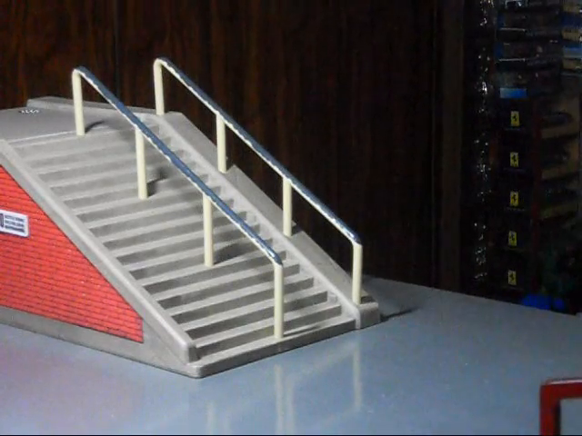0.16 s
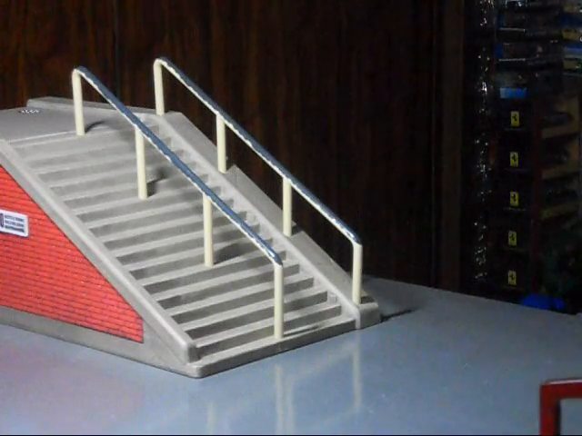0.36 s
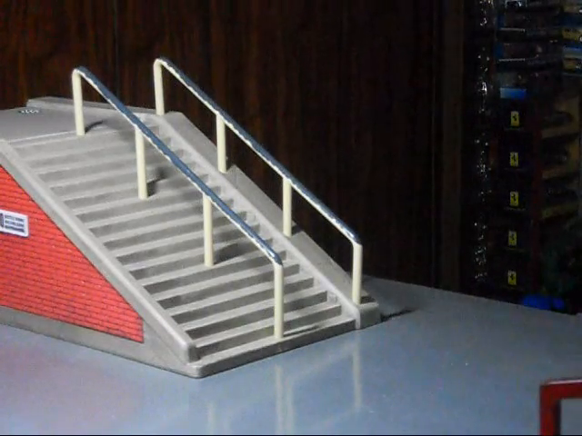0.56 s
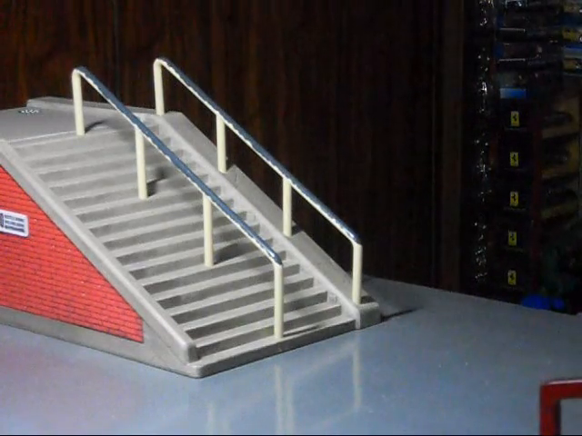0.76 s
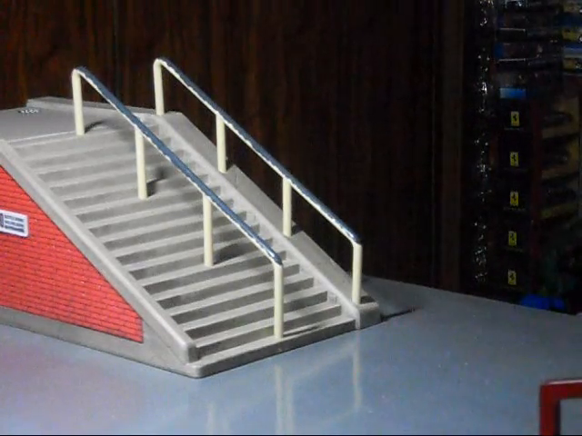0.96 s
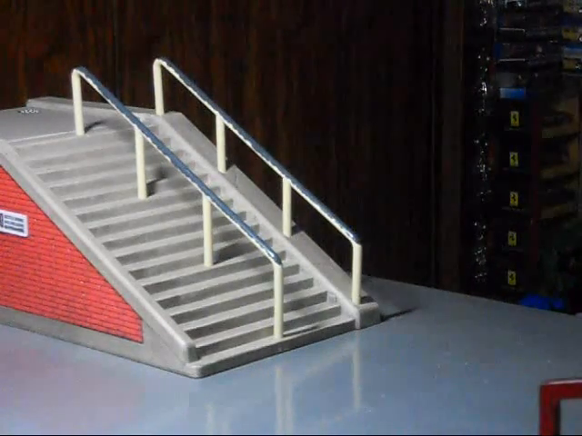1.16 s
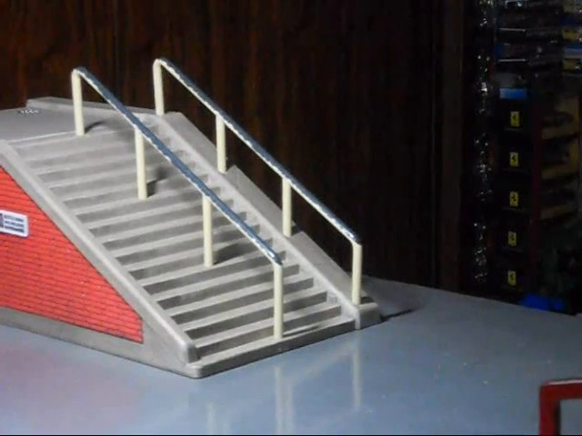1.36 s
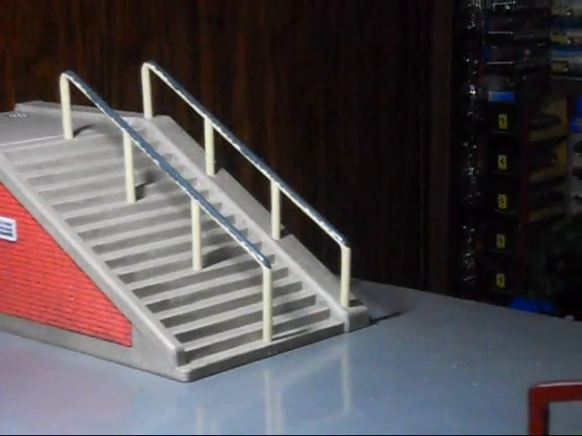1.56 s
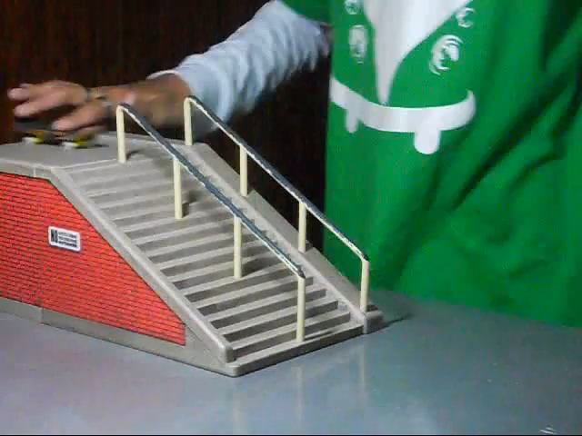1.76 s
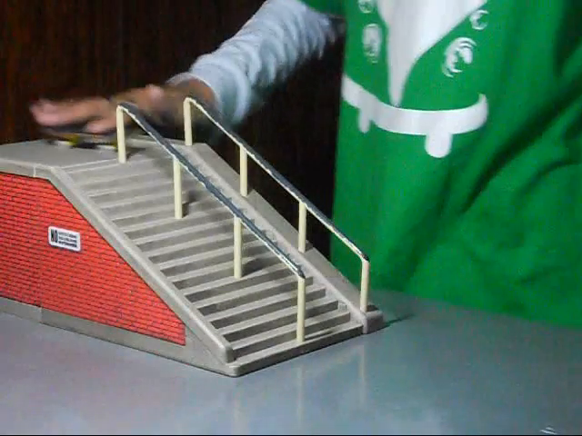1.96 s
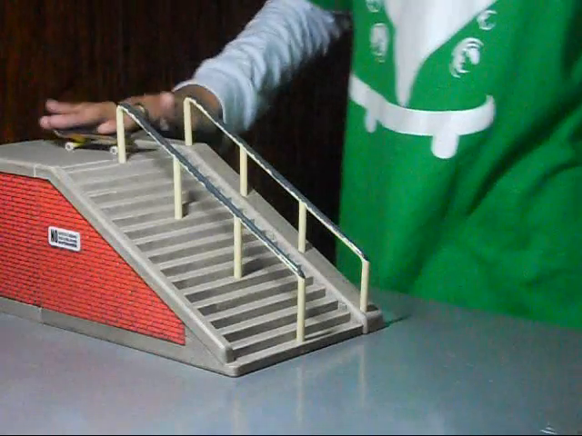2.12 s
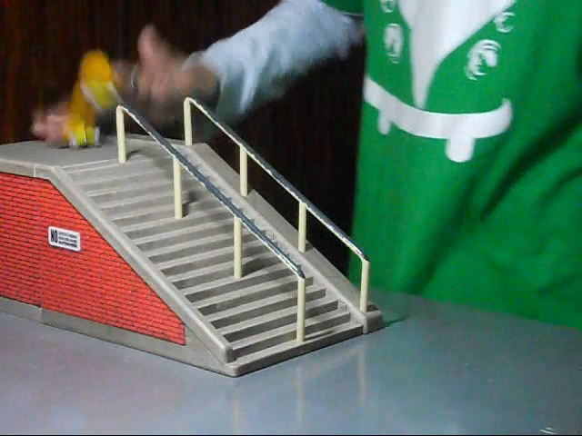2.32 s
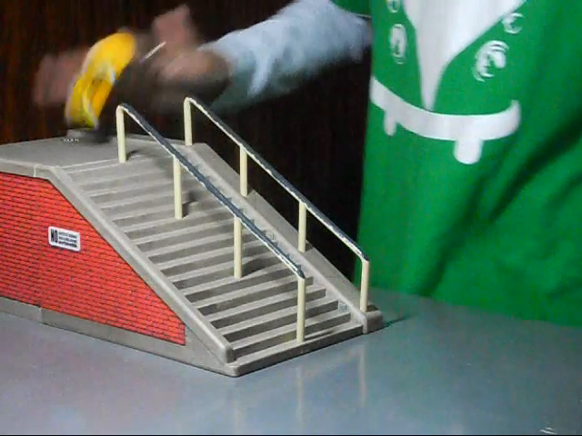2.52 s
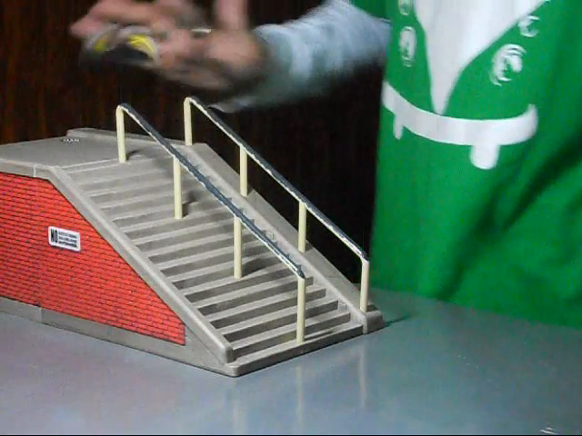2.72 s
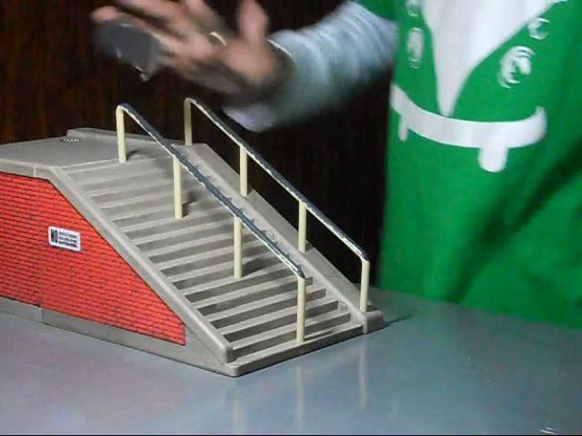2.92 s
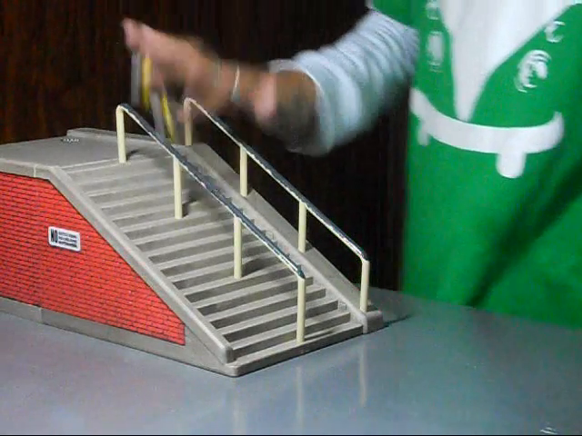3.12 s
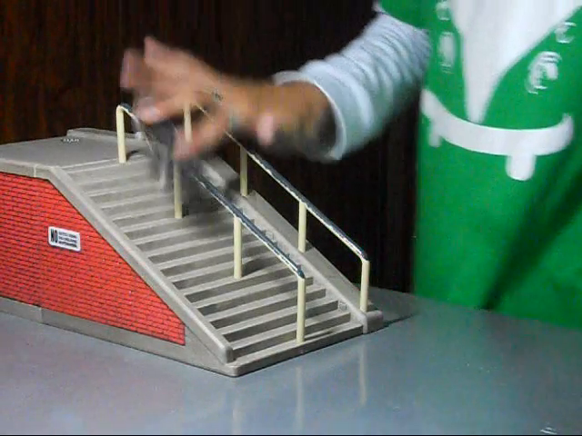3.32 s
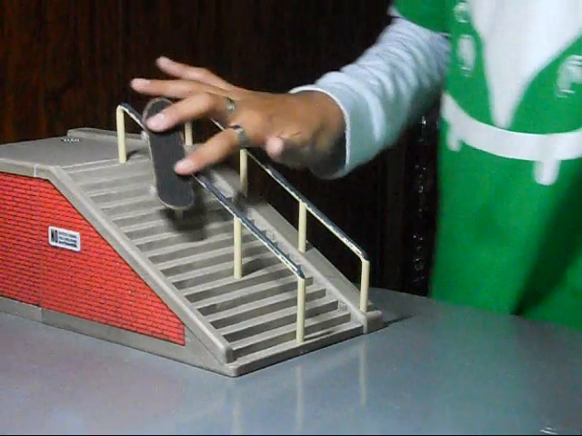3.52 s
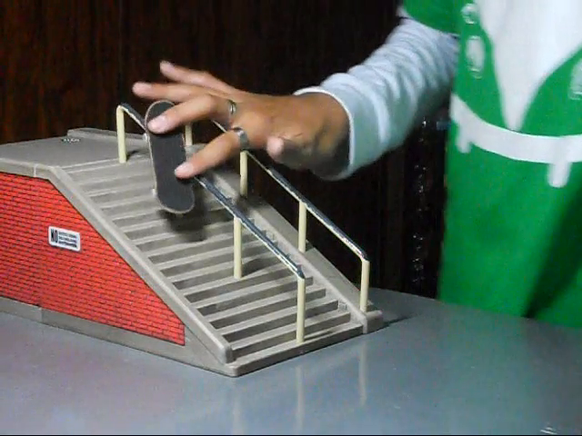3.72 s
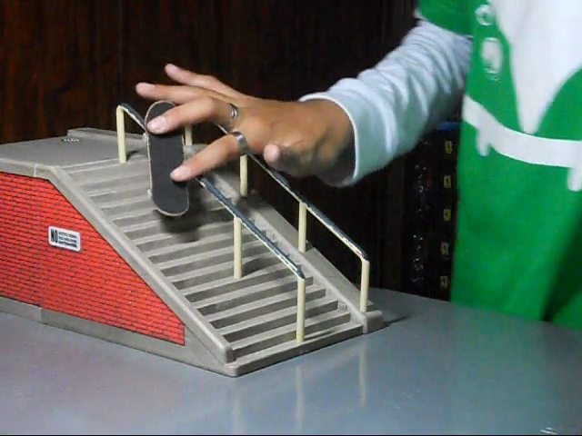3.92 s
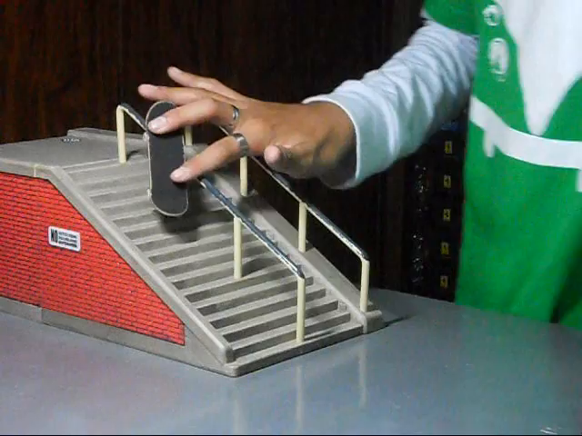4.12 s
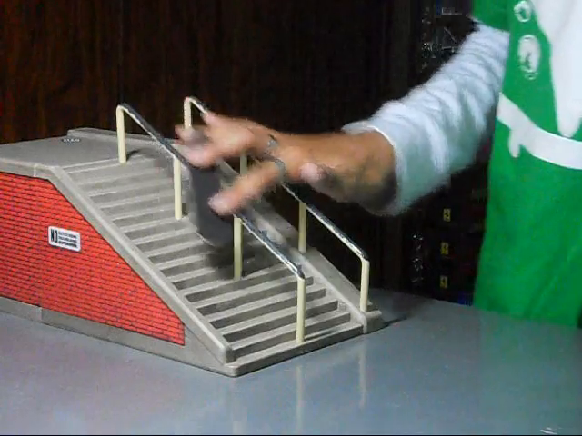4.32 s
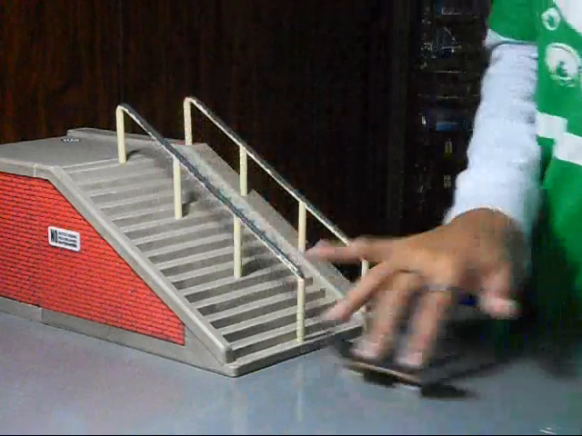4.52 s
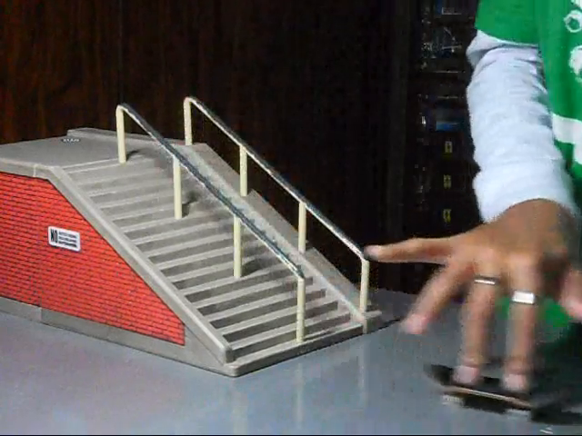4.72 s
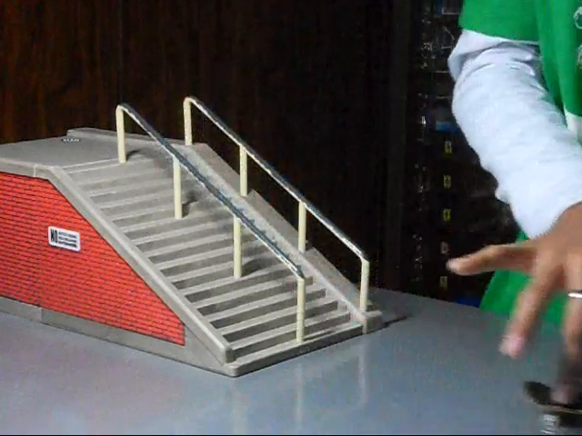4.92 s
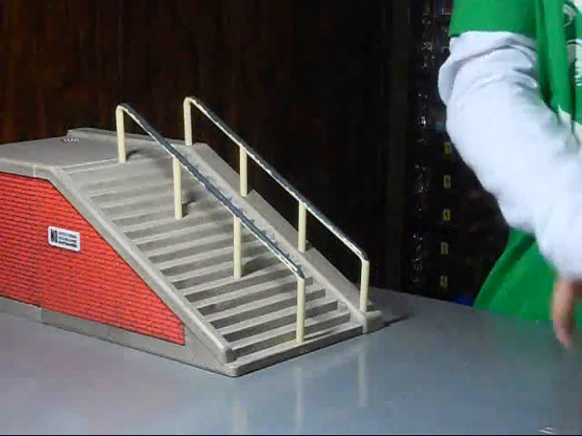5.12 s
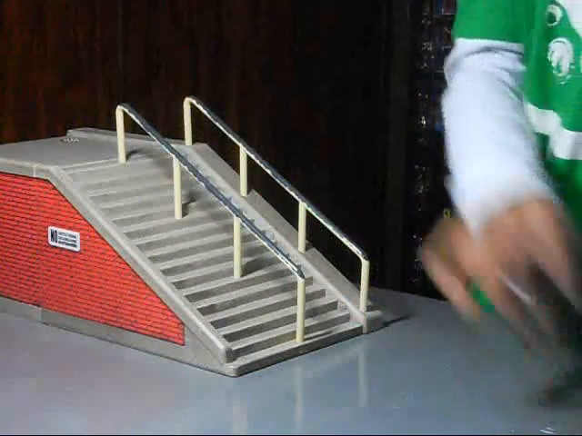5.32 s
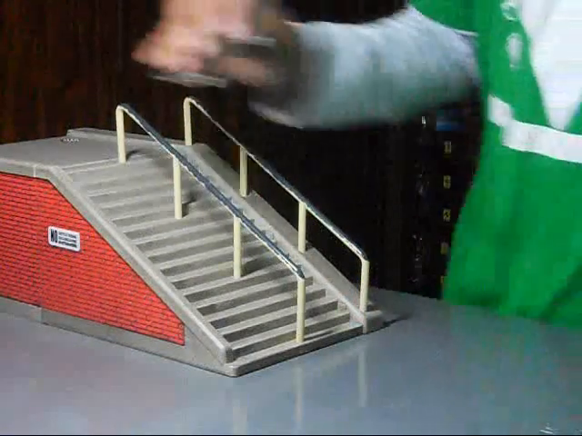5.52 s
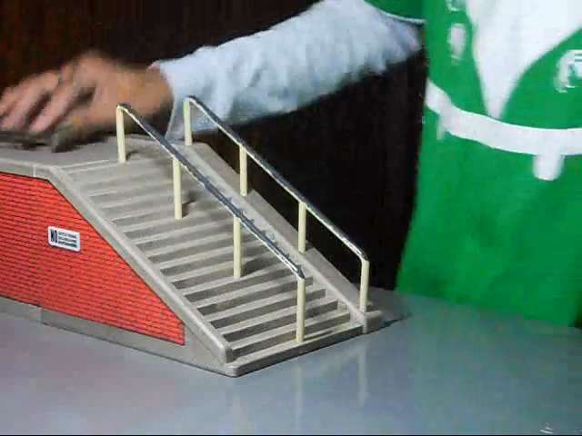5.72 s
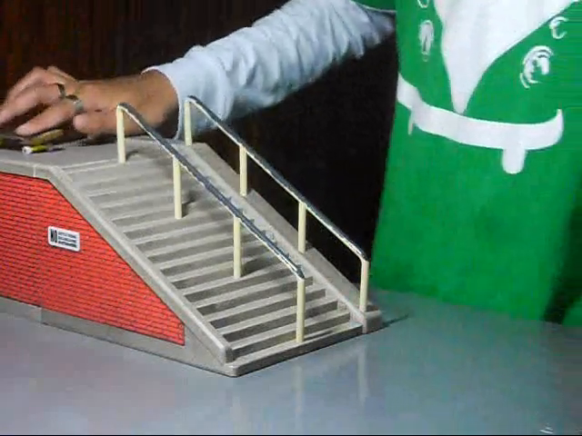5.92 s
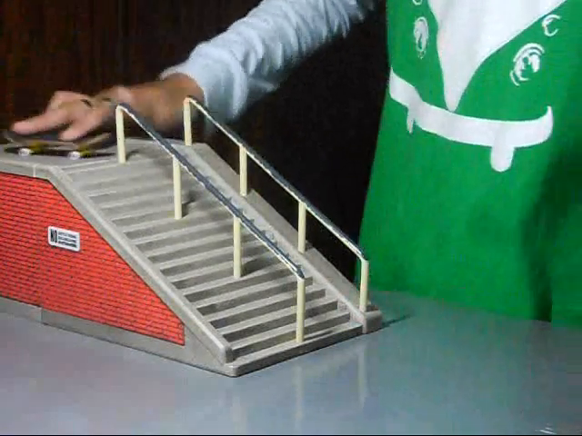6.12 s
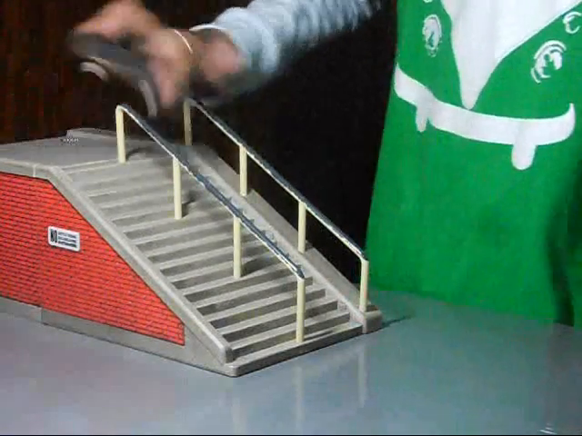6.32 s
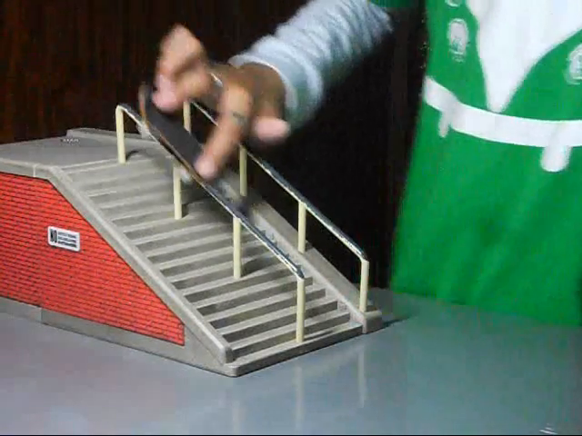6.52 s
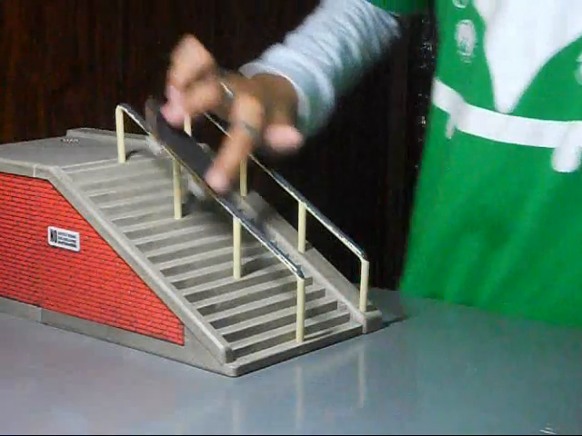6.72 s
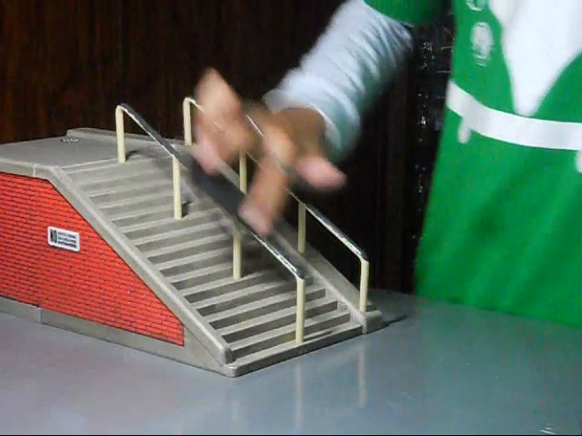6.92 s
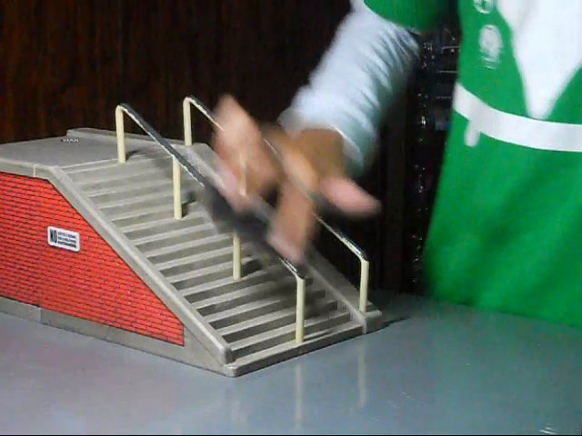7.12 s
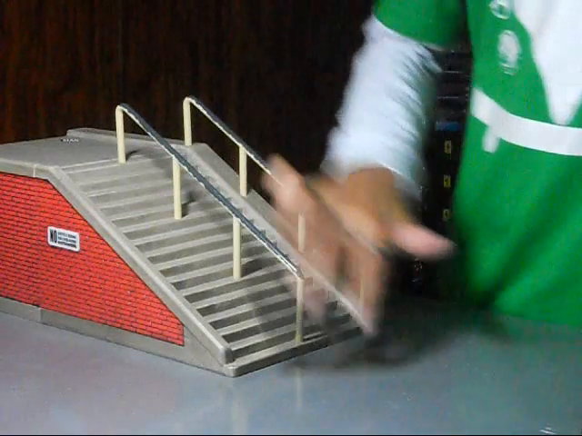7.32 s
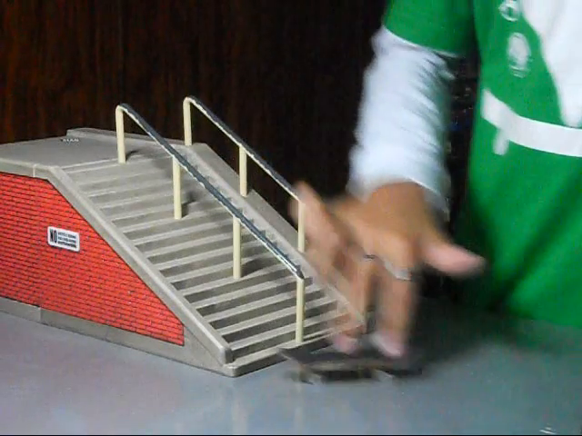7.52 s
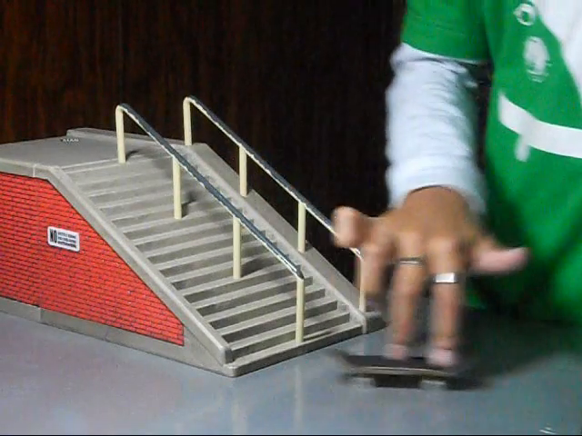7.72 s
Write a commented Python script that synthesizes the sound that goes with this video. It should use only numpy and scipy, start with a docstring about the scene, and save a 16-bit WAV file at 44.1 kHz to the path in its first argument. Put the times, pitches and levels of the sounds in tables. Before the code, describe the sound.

Small plastic wheels drone and scrape briefly, then ticks and soft handling bumps lead into a slowed passage of low groaning roll, hollow platform knock and heavy rail clatter. At true speed the board smacks the tabletop, rolls away, is clacked back onto the platform and popped. Its slide and clustered table knocks are again slowed and deepened. Dry little room, close basic camera microphone, low hum.

```python
"""In a small room, a toy skateboard rolls, pops and lands on a hollow plastic stair set and a tabletop.
Its knocks, and two taps out of view, are filtered-noise clicks, ringing modes and a room tail;
rolls are drones and coloured noise. Camera handling, hiss, low air and appliance tones lie beneath.
A compact camera stores 22050 samples/s; two tricks are replayed at quarter speed by holding each sample longer.
Tables give playback time; pitches, hit decays and room decays are those of the live sound."""
import sys
import numpy as np
from scipy import signal
from scipy.fft import rfft, irfft, next_fast_len
from scipy.io import wavfile
from scipy.ndimage import map_coordinates

SR = 44100
rng = np.random.default_rng(int(sys.argv[2]) if len(sys.argv) > 2 else 0)


def transcribe(u):
    """Save the signal u as a 16-bit wav file named by the first command-line argument.

    u: samples, shape (n,) or (channels, n), limited to [-1, 1]; the rate is SR.
    q: integer samples, one column per channel.
    """
    v = np.clip(np.atleast_2d(u).T, -1, 1)
    q = np.round(v * 32767).astype(np.int16)
    wavfile.write(sys.argv[1], SR, q)


N = 342216

# Playback parts. Each row: start in seconds, output samples per stored sample.
REPLAY_PARTS = [(0, 2), (1.785, 8), (4.252, 2), (6.517, 8)]
# Knocks: blows of the board, and two taps out of view.
# Each row: time in seconds, click peak in dB, click t60 in seconds, knock in dB, place.
HITS = [(1.3285, -29.5, .008, -25.5, "out of view"), (1.337, -11.5, 0.0062, -23.5, "out of view"),
        (2.34, -5, 0.0116, -20, "platform"), (2.352, -10.5, 0.041, -11.5, "platform"),
        (2.396, -20, 0.0063, -22.5, "platform"), (3.276, 7, 0.0067, -12.5, "rail"),
        (3.287, 0, 0.0083, -16, "rail"), (3.296, 0.5, 0.0095, -27.5, "rail"),
        (3.3123, 1, 0.021, -22, "rail"), (3.329, -8.5, 0.026, -28, "rail"),
        (4.561, 1, 0.0093, -16.5, "table"), (4.5649, -2.5, 0.0195, -6, "table"),
        (4.5734, 1, .009, -5.5, "table"), (4.579, 1, 0.016, -21, "table"),
        (5.8064, 1.5, 0.063, -12.5, "set down"), (5.8124, -7, 0.012, -20, "set down"),
        (5.822, -3, .036, -12, "set down"), (5.838, -3.5, .096, -18, "platform"),
        (6.291, -8.5, .061, -12, "platform"), (6.32, -25, 0.0257, -19.5, "platform"),
        (6.454, -2, 0.04, -22, "rail slide"), (7.4623, -1, 0.013, -12, "table"),
        (7.4888, 0, 0.0051, -14, "table"), (7.518, -8, 0.0069, -22.5, "table"),
        (7.5229, 0, 0.037, -7, "table"), (7.535, -20, 0.0059, -26, "table"),
        (7.548, -9, 0.0046, -18, "table")]
# Strike places. Each entry: click pitch in Hz, centre of the modes reached in Hz, room answer in dB over the knock.
STRIKE_PLACES = {"out of view": (5100, 2200, -24), "platform": (5380, 500, -14.5),
                 "rail": (6830, 690, -11.5), "rail slide": (6870, 1330, -4), "table": (4390, 985, -17.5),
                 "set down": (5260, 1230, -12.5)}
# Light ticks that miss the ramp's modes. Each row: time in seconds, click peak in dB, pitch in Hz.
TICKS = [(0.289, -19, 5600), (0.34, -11, 5700), (.354, -12.5, 5800), (0.368, -13, 6200), (0.395, -16, 4200),
         (0.417, -10, 2670), (.475, -17, 6000), (1.2007, -5, 3950), (1.203, -12, 6340), (1.327, -9, 2840),
         (1.3263, -15.5, 5560), (2.448, -18, 9100), (3.1074, -25.5, 4500), (4.47, -34, 3000),
         (4.485, -27, 3200), (4.512, -22, 5400), (4.522, -19.5, 3620), (5.028, -45.5, 4000),
         (5.05, -44, 4300), (6.4501, -2, 4470)]
# Modes of hollow ramp and tabletop. Each row: frequency in Hz, relative level in dB, t60 in seconds.
RAMP_MODES = [(410, -6.5, 0.13), (502, -10.5, 0.12), (653, -0.5, 0.1), (768, 1.5, 0.029),
              (887, -2.5, 0.081), (1037, -12, 0.09), (1250, -4, 0.071), (1507, 0.5, .05), (2157, 5, 0.055)]
# Lowest tabletop mode: frequency in Hz, t60 in seconds.
TABLETOP_MODE = (138, 0.36)
# Room decay. Each row: frequency in Hz, t60 in seconds.
ROOM_T60 = [(150, 0.39), (640, 0.44), (2000, 0.26), (5000, 0.45), (10000, 0.37)]
# Room colour. Each row: frequency in Hz, relative level in dB.
ROOM_COLOUR = [(60, -42), (140, -12), (390, 7), (640, 3), (1500, -2.5), (3000, -3.5), (5000, -6.5),
               (7500, -10.5), (11000, -10)]
# Rolls and slides. Each row: full contact in seconds, hold in seconds, swell in dB/s, fade in dB/s,
# drone pitch in Hz, drone in dB, scrape in dB, fizz in dB, deck rumble in dB.
ROLLS = [(0, 0.4, 300, 250, 969, -25.5, -36, -44, -31.5),
         (0.381, .08, 150, 138, 943, -35.5, -23, -33.5, -32),
         (1.88, 0.11, 158, 45, 827, -31, -28, -40, -28),
         (4.39, 0.025, 300, 150, 400, -47.5, -64, -62, -52.5),
         (4.49, 0.064, 250, 900, 1150, -50.5, -39.5, -43, -54),
         (4.586, 0.0061, 902.5, 140, 887, -32, -22, -41, -15.5),
         (4.764, 0.034, 150, 52.5, 945, -40, -52, -73, -43.5),
         (5.04, 0.14, 500, 63.5, 930, -64, -62, -74, -59),
         (5.834, .01, 899, 148.5, 1120, -44, -19.5, -22.5, -30),
         (6.163, 0.038, 327, 190, 1216, -44, -31, -38.5, -27.5),
         (6.927, 0.11, 300, 150, 618, -39.5, -50, -48, -41),
         (7.1, 0.044, 200, 200, 6400, -45, -63, -47, -58), (7.142, .13, 150, 80, 615, -46, -40, -46.5, -61),
         (7.64, .12, 150, 100, 894, -33, -28, -32, -28.5)]
# Deck and truck resonances. Each row: frequency in Hz, width in Hz, relative level in dB.
DECK_PEAKS = [(520, 320, -6.5), (860, 650, -4), (1330, 530, -2), (3600, 400, -27)]
# Scrape spectrum. Each row: frequency in Hz, relative level in dB per Hz.
SCRAPE_SPECTRUM = [(300, -58), (700, -4), (1600, -4), (2500, 2), (2800, 0.5), (3100, 0.5), (3450, 1),
                   (3900, -0.5), (5000, -3.5), (7000, -19), (12000, -64)]
# Fizz spectrum. Each row: frequency in Hz, relative level in dB per Hz.
FIZZ_SPECTRUM = [(3000, -42), (4800, 4), (6000, 2.5), (7000, 1), (8500, -2.5), (11000, -11), (14000, -60)]
# Finger shifts on the camera body. Each row: time in seconds, level in dB, fade in dB/s.
FINGER_SHIFTS = [(1.124, -27.5, 55), (1.329, -23, 38), (1.52, -24, 94), (1.655, -30, 100), (1.691, -11, 98)]
# Spectrum of the finger thuds. Each row: frequency in Hz, relative level in dB per Hz.
THUD_SPECTRUM = [(8.8, -27), (15, 7.5), (70, -7), (135, -7.5), (188, -24), (260, -38), (340, -53),
                 (570, -120)]
# Brief rustle near the camera. Each row: time in seconds, level in dB, hold in seconds, swell in dB/s, fade in dB/s.
RUSTLE = [(1.712, -20, 0.016, 900, 1200)]
# Rustle resonances. Each row: frequency in Hz, width in Hz, relative level in dB.
RUSTLE_PEAKS = [(488, 144, 9), (1900, 500, -6), (3080, 340, 4.5), (4300, 1700, -7), (6100, 1300, -3),
                (8980, 1700, -3.5)]
# Room tone level. Each row: time in seconds, level in dB.
TONE_LEVEL = [(0, -41), (.45, -35), (1.78, -32.5), (2.3, -35.5), (3.2, -39), (4.25, -50), (4.9, -54.5),
              (5.45, -56), (5.6, -46.5), (5.8, -42), (6.3, -42.5), (6.52, -47), (6.9, -44), (7.4, -44),
              (7.76, -55)]
# Hiss spectrum. Each row: frequency in Hz, relative level in dB per Hz.
HISS_SPECTRUM = [(150, -51), (260, -15), (334, -5.5), (403, -11), (1180, -10), (1700, -15.5), (5230, -21),
                 (9770, -28.5), (10900, -27.5), (14200, -72.5), (22000, -120)]
# Low air spectrum. Each row: frequency in Hz, relative level in dB per Hz.
LOW_AIR_SPECTRUM = [(12, -28.5), (20, -14), (44, 1.5), (80, -16), (113, -0.5), (232, -3.5), (280, -12),
                    (360, -24.5), (620, -120)]
# Appliance tones. Each row: frequency in Hz, relative level in dB.
APPLIANCE_TONES = [(338.6, -3.5), (7850, -24)]
# Appliance tones over the hiss: one level in dB per playback part.
HUM_DB = [0.5, -6, -3.5, -4]
# Low air over the hiss: one level in dB per playback part.
LOW_AIR_DB = [-9, -17, -12, -8]

BOOM_DB = -17.5  # tabletop boom over the knock
TICK_T60_S, TICK_ROOM_DB = 0.012, -40.5  # room answer over the tick
WHINE_RATIO, WHINE_DB = 3.5, -12.5  # a wider band of the bearings, relative to the drone
GRIP_DB_PER_S, GRIP_END_S = 400, 1.785
QUIET_DB = 60  # depth of a swell's ends
MIC_LOW_HZ = 95  # airborne sound of the hits and rolls is weakened below this
STORED_TOP_HZ, TOP_HZ = SR / 4, 15500


def hits():
    """Each hit clicks and rings the ramp's modes; ticks only click."""
    out, t = np.zeros(N + SR), np.arange(SR // 2) / SR
    for s, click_db, t60_s, knock_db, place in HITS:
        click_hz, centre_hz, room_db = STRIKE_PLACES[place]
        knock = np.zeros(len(t))
        for hz, mode_db, ring_s in RAMP_MODES:
            # modes far from the centre are struck more weakly
            reach_db = -16 * np.log2(hz / centre_hz) ** 2
            level_db = mode_db + rng.normal(0, 2) + reach_db
            tuned_hz = hz * rng.normal(1, 0.02)
            knock += amp(level_db - 60 * t / ring_s) * np.sin(2 * np.pi * tuned_hz * t)
        knock *= amp(knock_db) * (1 - np.exp(-t / 0.0018))
        click = contact(t, click_db, click_hz, t60_s, knock_db + room_db)
        out[round(live(s)):][:len(t)] += knock + click
    for s, tick_db, hz in TICKS:
        tick = contact(t, tick_db, hz, TICK_T60_S, tick_db + TICK_ROOM_DB)
        out[round(live(s)):][:len(t)] += tick
    return out[:N]


def contact(t, click_db, click_hz, t60_s, room_db):
    """A click of small hard parts: decaying noise through resonances, plus the room's answer."""
    crack = amp(-60 * t / t60_s) * rng.standard_normal(len(t)) * (1 - np.exp(-t / 0.000068))

    def body(hz):
        return resonance(hz, click_hz, 0.23 * click_hz) + 0.077 * resonance(hz, 4650, 4500) ** 2

    def tint(hz):
        return 1 + 0.68 * resonance(hz, click_hz, 0.2 * click_hz)

    click = filtered(crack, body)
    # the answer swells in softly and keeps the colour of the click
    answer = filtered(room_tail(), tint) * (1 - np.exp(-(t / 0.00071) ** 2))
    return amp(click_db) * click / np.abs(click).max() + amp(room_db) * answer


def room_tail():
    """A fresh reverberant tail, rms 1 over its first 0.1 s; each frequency dies at its own speed."""
    hz, t, z = signal.stft(rng.standard_normal(SR // 2), SR, nperseg=256)
    decay_db = -60 * t / along(ROOM_T60, hz)[:, None]
    colour_db = along(ROOM_COLOUR, hz)[:, None]
    tail = signal.istft(z * amp(colour_db + decay_db), SR, nperseg=256)[1]
    return tail[:SR // 2] / np.std(tail[:SR // 10])


def thumps():
    """Under each hit the tabletop booms briefly in its lowest mode, slightly detuned."""
    out, t = np.zeros(N + SR), np.arange(SR // 2) / SR
    hz, t60_s = TABLETOP_MODE
    for s, _, _, knock_db, _ in HITS:
        boom_hz = hz * rng.normal(1, 0.047)
        boom = np.sin(2 * np.pi * boom_hz * t) * (1 - np.exp(-t / 0.006))
        out[round(live(s)):][:len(t)] += amp(knock_db + BOOM_DB - 60 * t / t60_s) * boom
    return out[:N]


def rolls():
    """Hard wheels drone in a narrow band and shake the deck; grit under them scrapes and fizzes."""
    t = np.arange(N) / SR
    lumps, grain = amp(0.77 * wobble(45)), amp(0.94 * wobble(120))
    # complex random envelopes widen the tones into bands
    sway = unit(wobble(260)) + 1j * unit(wobble(260))
    flutter = unit(wobble(900)) + 1j * unit(wobble(900))
    deck = peaks(rng.standard_normal(N), DECK_PEAKS)
    scrape, fizz = noise(SCRAPE_SPECTRUM), noise(FIZZ_SPECTRUM)
    out = np.zeros(N)
    for s, hold_s, rise, fade, hz, drone_db, scrape_db, fizz_db, deck_db in ROLLS:
        drone = np.real(sway * np.exp(2j * np.pi * hz * t))
        whine_hz = WHINE_RATIO * hz
        if whine_hz < STORED_TOP_HZ:
            drone += amp(WHINE_DB) * np.real(flutter * np.exp(2j * np.pi * whine_hz * t))
        wheels = lumps * (amp(drone_db) * drone + amp(deck_db) * deck)
        grit = grain * (amp(scrape_db) * scrape + amp(fizz_db) * fizz)
        out += swell(s, hold_s, rise, fade) * (wheels + grit)
    return out


def handling():
    """Fingers on the camera body push low lumps into the microphone; a brief rustle brushes past it."""
    grip = sum(amp(db) * swell(s, 0, GRIP_DB_PER_S, fade) for s, db, fade in FINGER_SHIFTS)
    grip *= np.arange(N) < live(GRIP_END_S)
    thuds = unit(noise(THUD_SPECTRUM) * amp(1.4 * wobble(24.15)))
    brush = sum(amp(db) * swell(s, *shape) for s, db, *shape in RUSTLE)
    return grip * thuds + brush * peaks(rng.standard_normal(N), RUSTLE_PEAKS)


def room_tone():
    """Microphone hiss, low air as coloured noise, and faint, slightly wavering appliance tones."""
    t = np.arange(N) / SR
    part_starts = live([s for s, _ in REPLAY_PARTS])
    part = np.searchsorted(part_starts, np.arange(N) + 1) - 1
    tones = np.zeros(N)
    for hz, db in APPLIANCE_TONES:
        tone = np.sqrt(2) * np.sin(2 * np.pi * hz * t + 0.3 * wobble(4))
        tones += amp(db + 1.5 * wobble(5)) * tone
    hiss = noise(HISS_SPECTRUM) * amp(0.59 * wobble(13))
    low_air = amp(LOW_AIR_DB)[part] * noise(LOW_AIR_SPECTRUM)
    return gains(TONE_LEVEL)[0] * (hiss + amp(HUM_DB)[part] * tones + low_air)


def swell(s, hold_s, rise_db_per_s, fade_db_per_s):
    """Live gain: a climb in dB, a hold at 1, a fall."""
    end_s = s + hold_s
    return gains([(s - QUIET_DB / rise_db_per_s, -QUIET_DB), (s, 0),
                  (end_s, 0), (end_s + QUIET_DB / fade_db_per_s, -QUIET_DB)])[0]


def gains(rows):
    """Live gain curves from rows (s, dB, ..), silent outside them."""
    s, *columns_db = np.transpose(rows)
    return np.array([amp(np.interp(np.arange(N), live(s), db, -200, -200)) for db in columns_db])


def live(s):
    """Playback seconds to live samples."""
    return np.interp(np.asarray(s) * SR, np.arange(N), live_clock())


def live_clock():
    """Live sample number reached at each playback sample; a longer hold slows it."""
    start_s, hold = np.transpose(REPLAY_PARTS)
    part = np.searchsorted(np.round(start_s * SR), np.arange(N), "right") - 1
    return np.cumsum(2 / hold[part]) - 1


def peaks(x, table):
    """x through steep resonances (Hz, width Hz, dB) of alternating sign, rms 1."""
    def response(f):
        return sum((-1) ** k * amp(db) * resonance(f, hz, width_hz) ** 2
                   for k, (hz, width_hz, db) in enumerate(table))
    return unit(filtered(x, response))


def resonance(hz, centre_hz, width_hz):
    """A causal one-peak response."""
    return 1j * hz * width_hz / (centre_hz ** 2 - hz ** 2 + 1j * hz * width_hz)


def noise(spectrum):
    """Coloured noise of rms 1."""
    return unit(filtered(rng.standard_normal(N), lambda hz: amp(along(spectrum, hz))))


def filtered(x, response):
    """x times a complex response of frequency."""
    m = next_fast_len(x.shape[-1] + 8192)
    spectrum = rfft(x, m) * response(np.fft.rfftfreq(m, 1 / SR))
    return irfft(spectrum, m)[..., :x.shape[-1]]


def wobble(rate_hz):
    """A smooth random curve, rate_hz knots per live second."""
    knots = rng.standard_normal(int(N * rate_hz / SR) + 4)
    return map_coordinates(knots, [np.arange(N) * rate_hz / SR])


def along(points, hz):
    """(Hz, value) points interpolated on a log axis."""
    f, v = np.transpose(points)
    return np.interp(np.log(hz + 1), np.log(f + 1), v)


def unit(x):
    """x scaled to rms 1."""
    return x / np.sqrt(np.mean(x ** 2) + 1e-20)


def amp(db):
    """dB to linear amplitude."""
    return 10 ** (np.asarray(db) / 20)


def scene():
    """The live sound, at true speed; the microphone thins the lows of hits and rolls."""
    airborne = hits() + thumps() + rolls()
    airborne = filtered(airborne, lambda hz: (1j * hz / (MIC_LOW_HZ + 1j * hz)) ** 3)
    return (airborne + handling() + room_tone())[None]


def record(dry):
    """Band-limit to half the storage rate, keep every second sample, clip softly, replay each sample held."""
    limited = filtered(dry, lambda hz: np.tanh(np.clip(STORED_TOP_HZ - hz, 0, None) / 450))
    stored = limited[:, ::2]
    stored = stored / (1 + np.abs(stored / 0.78) ** 6) ** (1 / 6)
    held = stored[:, (live_clock() // 2).astype(int)]
    return filtered(held, lambda hz: hz < TOP_HZ)


dry = scene()
out = record(dry)
transcribe(out)
```